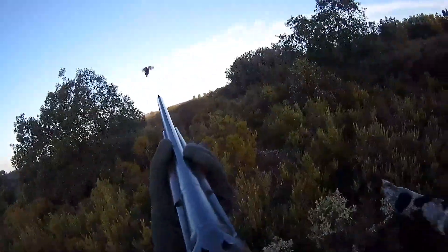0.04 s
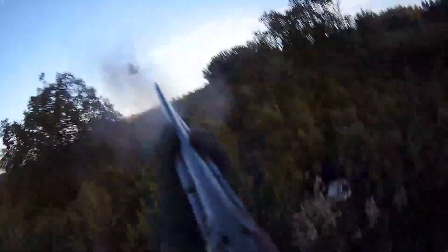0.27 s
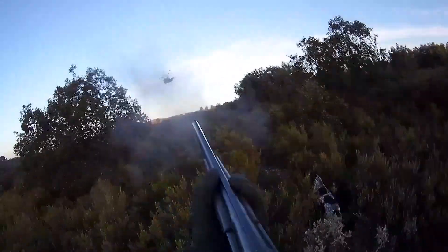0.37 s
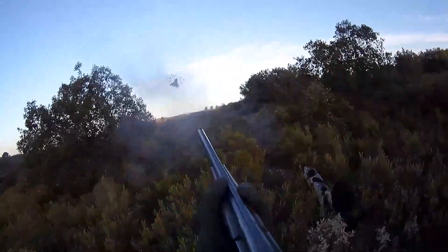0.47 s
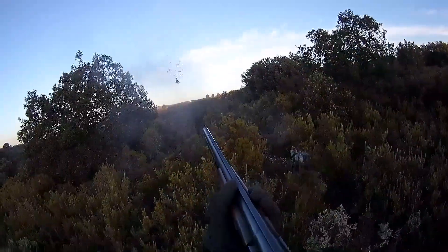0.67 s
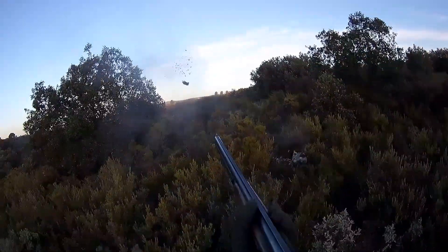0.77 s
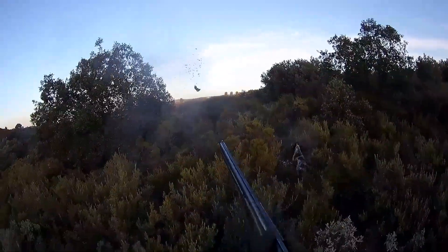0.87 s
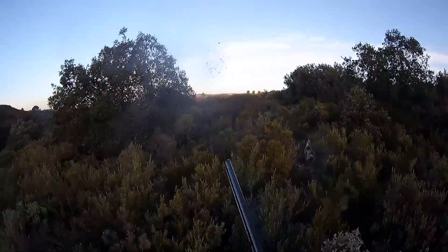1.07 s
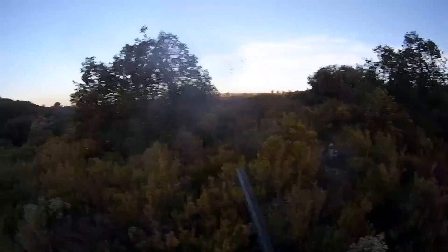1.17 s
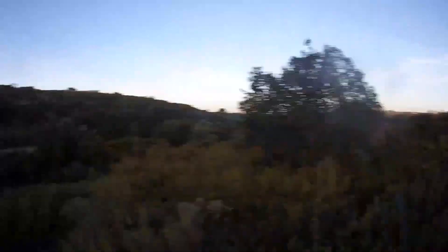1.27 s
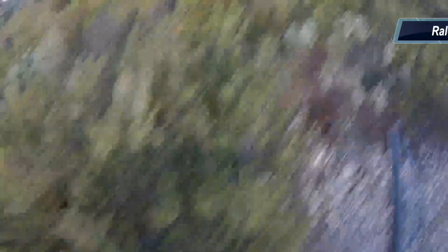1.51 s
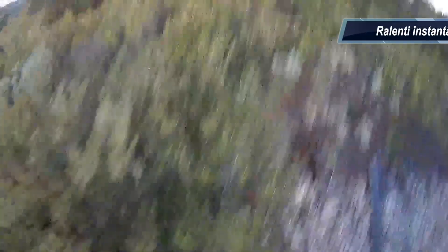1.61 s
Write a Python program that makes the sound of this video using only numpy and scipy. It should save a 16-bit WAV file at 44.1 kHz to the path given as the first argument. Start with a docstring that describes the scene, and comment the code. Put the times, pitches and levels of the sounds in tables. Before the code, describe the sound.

A single close shotgun shot with a rolling hillside echo, then a faint metallic click.

```python
"""Open scrub below a hillside: one shotgun shot overloads the camera that the shooter wears. Near bushes throw
the blast back in clumps, then the hillside returns a long roll. Clothes rustle, twigs flick, wind buffets the
microphone and the gun's steel action clicks. After a brief silence the scene changes to muffled knocks and
rubbing on the camera."""
import sys
import numpy as np
from scipy import signal
from scipy.fft import rfft, irfft
from scipy.io import wavfile
from scipy.ndimage import uniform_filter1d

SR = 44100
rng = np.random.default_rng(int(sys.argv[2]) if len(sys.argv) > 2 else 0)


def bounce(signal):
    """Save signal as a 16-bit WAV file at the path given by the first command-line argument."""
    frames = np.transpose(np.atleast_2d(signal))
    limited = np.clip(frames, -1, 1)
    pcm = np.round(limited * 32767).astype(np.int16)
    wavfile.write(sys.argv[1], SR, pcm)


N = 72765
T = np.arange(N) / SR

# Envelopes. Each row: time in seconds, level in dB.
RUSTLE_ENVELOPE = [(0, -56.5), (.1, -59.5), (.14, -52), (.165, -59.5), (.2, -58), (.5, -62.5),
                   (1.15, -69.5), (1.25, -61.5), (1.36, -60), (1.45, -57)]
WIND_ENVELOPE = [(0, -44.5), (.2, -43), (.4, -62), (1.15, -51.5), (1.3, -50), (1.45, -54)]
BLAST_ENVELOPE = [(.232, -25.5), (.2348, -26), (.2365, -14.5), (.239, -8.5), (.241, 9), (.246, -4.5),
                  (.253, -8), (.262, -17), (.275, -21), (.32, -44.5), (.42, -110)]
RUB_ENVELOPE = [(1.5, -38.5), (1.525, -45), (1.546, -29.5), (1.56, -35), (1.58, -30.5), (1.598, -49.5),
                (1.63, -41.5), (1.65, -48)]

# Noise spectra. Each row: frequency in Hz, relative density in dB.
RUSTLE_SPECTRUM = [(60, -8), (170, -3), (260, -3.5), (400, -4.5), (700, -4), (1200, -4), (1600, -11),
                   (2700, -12.5), (4500, -22), (6000, -39), (9000, -42.5), (14000, -53.5)]
WIND_SPECTRUM = [(3, -12.5), (15, 9), (28, -2.5), (50, -16), (100, -25.5), (300, -40.5), (1000, -77.5)]
HISS_SPECTRUM = [(6000, -3.5), (12000, -3.5), (14000, -10.5), (16000, -19)]
TWIG_SPECTRUM = [(100, -17), (1000, -1), (2500, -1), (4700, -10), (6200, -24), (12000, -50.5)]
BLAST_SPECTRUM = [(30, -11), (100, -7.5), (200, -1.5), (310, -6.5), (450, -2), (900, -1.5), (1300, -4.5),
                  (1680, 2), (2050, -3), (2600, -4), (4000, -12.5), (7000, -28.5), (11000, -38.5),
                  (16000, -50)]
ECHO_SPECTRUM = [(40, -29.5), (220, -10.5), (350, -12.5), (550, -1.5), (800, 1.5), (1250, 2.5), (1800, -8),
                 (2700, -6), (4000, -21), (7000, -35.5), (10000, -54.5), (15000, -72)]
ROLL_SPECTRUM = [(25, -40), (45, -19), (90, -1), (160, -25), (240, -8.5), (350, -3.5), (554, -6.5),
                 (800, -1), (1150, 1.5), (1570, -12), (2900, -12), (3500, -23.5), (6000, -36.5),
                 (9000, -75), (12000, -78)]
SWELL_SPECTRUM = [(30, -31), (90, 2), (170, -36), (240, 0.5), (340, 6), (480, -10.5), (1000, -40),
                  (3000, -80)]
SLAP_SPECTRUM = [(40, -14), (180, -6), (320, -7), (600, 6.5), (1150, 9.5), (1700, -17), (3000, -30),
                 (5000, -32), (9000, -77)]
RUB_SPECTRUM = [(15, -0.5), (40, -3.5), (80, -10.5), (170, -11.5), (320, -25), (550, -30), (1100, -38),
                (1700, -56), (2700, -62), (3500, -75.5), (8000, -96)]

# Noise bursts. Each row: start in seconds, level in dB, decay in seconds.
TWIG_BURSTS = [(.054, -61, 0.0033), (.162, -51, 0.011), (.224, -46, 0.0025), (.968, -50, 0.0011),
               (1.275, -51, 0.0028), (1.292, -59.5, 0.024), (1.39, -78, .003), (1.451, -47, 0.0036)]
ECHO_BURSTS = [(.284, -13, 0.01), (.298, -21.5, 0.011), (.334, -23.5, 0.0051), (.346, -27, 0.0047),
               (.374, -34.5, 0.015), (.384, -30, 0.012), (.393, -30.5, 0.0046), (.429, -40.5, .012),
               (.444, -35, 0.024)]
SWELL_BURSTS = [(.555, -43.5, 0.014), (.6, -46, 0.028), (.63, -58.5, 0.065), (.712, -42, 0.014)]
SLAP_BURSTS = [(.566, -47.5, 0.011), (.711, -42.5, 0.014), (.7695, -39, 0.0062), (.8325, -38, 0.0032),
               (.866, -42.5, 0.0076), (.943, -41, .005), (1.02, -48, 0.022), (1.2395, -54, 0.0019)]

# Squeaks. Each row: start in seconds, length in seconds, pitch in Hz, level in dB.
SQUEAK_TONES = [(.065, 0.017, 416, -43.5), (0.113, .04, 867, -51)]
# Scatter from the scrub. Each row: frequency in Hz, relative density in dB, T60 in seconds.
SCRUB_BANDS = [(40.24, -14, .5), (119, -1, .45), (200, -5.5, 1), (352, -6, 0.52), (600, -5, 0.26),
               (990, -3.5, 0.75), (1500, -2.5, 0.54), (2600, -7, .65), (4520, -12, .5), (7850, -20, .33),
               (10000, -33.5, 0.22), (15000, -49, .12)]
# Clicks of the action. Each row: start in seconds, gain in dB.
ACTION_CLICKS = [(1.3139, -37), (1.32, -54), (1.331, -50.5), (1.357, -65)]
# Ring of the gun's steel. Each row: frequency in Hz, relative level in dB, T60 in seconds.
STEEL_MODES = [(1478, -4, 0.011), (2600, 2.5, 0.0089), (3340, -14, 0.012), (4350, 4.5, 0.0091),
               (6080, -12.5, 0.03), (6430, -19, 0.015), (10400, -27, 0.0087)]
# Knocks on the camera. Each row: start in seconds, gain in dB, pitch in Hz, decay in seconds.
CAMERA_KNOCKS = [(1.521, -32, 250, 0.0051), (1.542, -40, 170, 0.0039), (1.566, -31.5, 171.3, 0.0079),
                 (1.574, -21, 244, 0.0049)]

SHOT_S = .2322


def amp(db):
    """Decibels to gain."""
    return 10 ** (np.asarray(db) / 20)


def unit_rms(x):
    """Scales to rms 1."""
    return x / np.sqrt(np.mean(x ** 2) + 1e-20)


def lookup(rows, hz, column=1):
    """Interpolates a column over log frequency."""
    table = np.array(rows, float)
    return np.interp(np.log(hz + 1), np.log(table[:, 0] + 1), table[:, column])


def envelope(rows):
    """Gain over time, linear in dB between rows."""
    return amp(np.interp(T, *np.transpose(rows)))


def coloured(x, spectrum):
    """Filters x by a spectrum, to rms 1."""
    gain = amp(lookup(spectrum, np.fft.rfftfreq(N, 1 / SR)))
    return unit_rms(irfft(rfft(x) * gain, N))


def noise(spectrum):
    """Coloured noise at rms 1."""
    return coloured(rng.standard_normal(N), spectrum)


def shaped(x, gain_db):
    """Applies gain_db(hz, t) to the short-time spectrum."""
    hz, t, bins = signal.stft(x, SR, nperseg=256)
    return signal.istft(bins * amp(gain_db(hz[:, None], t)), SR, nperseg=256)[1][:N]


def since(start_s):
    """Seconds elapsed, zero before the start."""
    return np.maximum(T - start_s, 0)


def ramp(start_s, rise_s):
    """Linear rise from 0 to 1."""
    return np.clip((T - start_s) / rise_s, 0, 1)


def burst(start_s, rise_s, decay_s):
    """Linear rise, exponential fall."""
    return ramp(start_s, rise_s) * np.exp(-since(start_s + rise_s) / decay_s)


def bursts(rows, rise_s):
    """Summed burst envelopes."""
    return sum(amp(db) * burst(start_s, rise_s, decay_s) for start_s, db, decay_s in rows)


def rustle(depth_db=3.5):
    """Clothes and brush rub unevenly as the shooter swings round."""
    def patches_db(hz, t):
        field = uniform_filter1d(rng.standard_normal((len(hz), len(t))), size=8, axis=0)
        return depth_db * np.tanh(unit_rms(uniform_filter1d(field, size=5, axis=1)))
    return shaped(noise(RUSTLE_SPECTRUM), patches_db) * envelope(RUSTLE_ENVELOPE)


def wind():
    """Light wind rumbles on the microphone."""
    return noise(WIND_SPECTRUM) * envelope(WIND_ENVELOPE)


def hiss(level_db=-83.5):
    """Steady microphone self-noise."""
    return amp(level_db) * noise(HISS_SPECTRUM)


def twigs():
    """Twigs and cloth flick."""
    return noise(TWIG_SPECTRUM) * bursts(TWIG_BURSTS, rise_s=.00067)


def squeaks(sag_fraction=.1056):
    """Faint tones that sag in pitch."""
    out = np.zeros(N)
    for start_s, length_s, hz, db in SQUEAK_TONES:
        progress = ramp(start_s, length_s)
        pitch_hz = hz * (1 + sag_fraction * (.5 - progress))
        out += amp(db) * np.sin(np.pi * progress) * np.sin(2 * np.pi * np.cumsum(pitch_hz) / SR)
    return out


def blast(swing_s=.2495, swing_width_s=.0015, swing_db=-1.5,
          boom_s=.2505, boom_width_s=.002, boom_db=-15):
    """The muzzle's crack rattles the camera housing; a pressure swing and a deep boom follow."""
    crack = noise(BLAST_SPECTRUM) * envelope(BLAST_ENVELOPE) * ramp(SHOT_S, rise_s=.0002)
    u = (T - swing_s) / swing_width_s
    swing = (2 * u ** 2 - 1) * np.exp(-u ** 2)
    v = since(boom_s) / boom_width_s
    boom = v * (1 - v / 2) * np.exp(-v)
    return crack + amp(swing_db) * swing + amp(boom_db) * boom / boom.max()


def scrub(gain_db=-24.5):
    """Countless twigs scatter the blast; the top treble dies first."""
    def decay_db(hz, t):
        return -60 * np.maximum(t - SHOT_S, 0) / lookup(SCRUB_BANDS, hz, column=2)
    return amp(gain_db) * shaped(noise(SCRUB_BANDS), decay_db) * ramp(SHOT_S, rise_s=.045)


def near_echoes():
    """Bushes and banks return the blast in smeared clumps."""
    return noise(ECHO_SPECTRUM) * bursts(ECHO_BURSTS, rise_s=.002)


def roll(start_s=.47, top_s=.56, hold_s=.082, level_db=-43.5, fall_db_per_s=26, grains_per_s=3500):
    """A swarm of hillside reflections builds, holds and fades, growing duller."""
    def dulling_db(hz, t):
        return -3 * np.maximum(t - top_s, 0) * np.log2(1 + hz / 1500)
    grain_db = 3.2 * np.minimum(rng.exponential(1, N), 3.5)
    signs = rng.choice([-1, 1], N)
    arrivals = rng.random(N) < grains_per_s / SR
    grains = coloured(amp(grain_db) * signs * arrivals, ROLL_SPECTRUM)
    gain = ramp(start_s, top_s - start_s) * amp(level_db - fall_db_per_s * since(top_s + hold_s))
    return shaped(grains, dulling_db) * gain


def swells():
    """Low echoes swell within the roll."""
    return noise(SWELL_SPECTRUM) * bursts(SWELL_BURSTS, rise_s=.0053)


def slaps():
    """Single sharp echoes stand out of the roll."""
    return noise(SLAP_SPECTRUM) * bursts(SLAP_BURSTS, rise_s=.0014)


def clicks(tick_db=.5):
    """Steel parts of the action meet: a tick and a short ring."""
    out = np.zeros(N)
    tick_noise = noise([(300, -19), (2000, 15), (6000, 9.5), (8000, -26),
                        (11000, -22), (13000, -33), (16000, -45)])
    for start_s, db in ACTION_CLICKS:
        t = since(start_s)
        ring = sum(amp(mode_db - 60 * t / t60_s) * np.sin(2 * np.pi * hz * t)
                   for hz, mode_db, t60_s in STEEL_MODES)
        tick = amp(tick_db) * tick_noise * burst(start_s, rise_s=.000067, decay_s=.0013)
        out += amp(db) * (ring + tick)
    return out


def handling(rise_s=.0013):
    """Rubbing, buffeting and dull knocks on the moving camera."""
    out = noise(RUB_SPECTRUM) * envelope(RUB_ENVELOPE)
    for start_s, db, hz, decay_s in CAMERA_KNOCKS:
        t = since(start_s)
        attack = 1 - np.exp(-(t / rise_s) ** 2)
        out += amp(db) * attack * np.exp(-t / decay_s) * np.sin(2 * np.pi * hz * t)
    return out


def scene(cut_s=1.4545, resume_s=1.502):
    """Shot and echoes over small close sounds, then a brief silence and the scene changes to handling. Mono."""
    shot = blast() + near_echoes() + scrub()
    hillside = roll() + slaps() + swells()
    close = rustle() + wind() + twigs() + squeaks() + clicks() + hiss()
    before = np.clip((cut_s - T) / .001, 0, 1)
    after = ramp(resume_s, rise_s=.003)
    return ((shot + hillside + close) * before + handling() * after)[None]


def record(dry):
    """Microphone overload flattens the peaks; a low-pass limits the band."""
    ceiling_db, knee, cutoff_hz = -9.5, 6, 15600
    clipped = dry / (1 + abs(dry / amp(ceiling_db)) ** knee) ** (1 / knee)
    lowpass = signal.firwin(255, cutoff_hz, window=("kaiser", 9), fs=SR)
    return signal.oaconvolve(clipped, lowpass[None], "same")


dry = scene()
out = record(dry)
bounce(out)
```